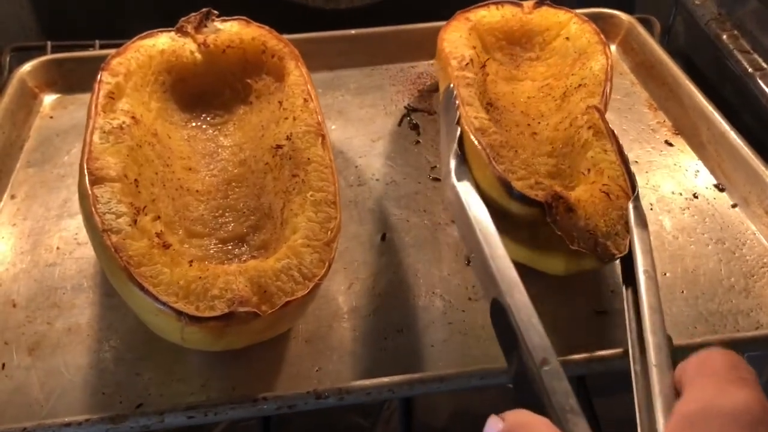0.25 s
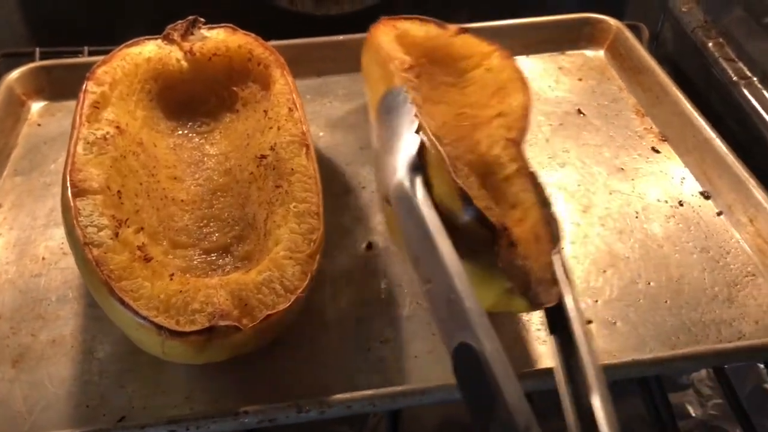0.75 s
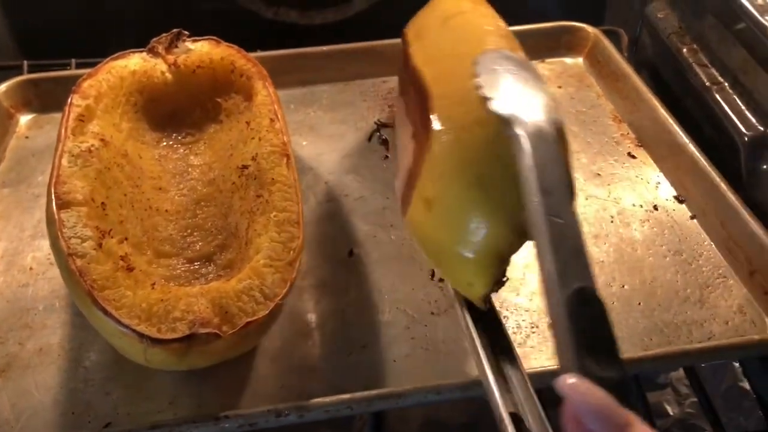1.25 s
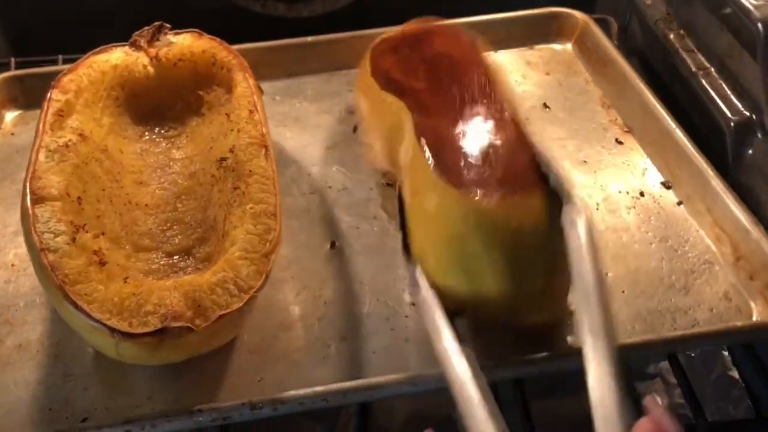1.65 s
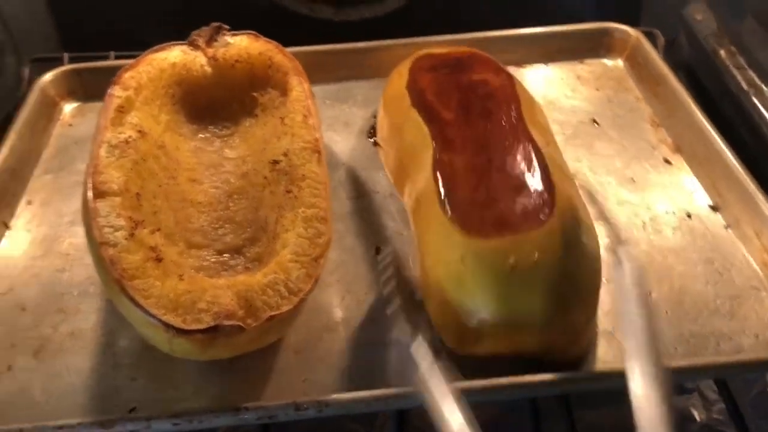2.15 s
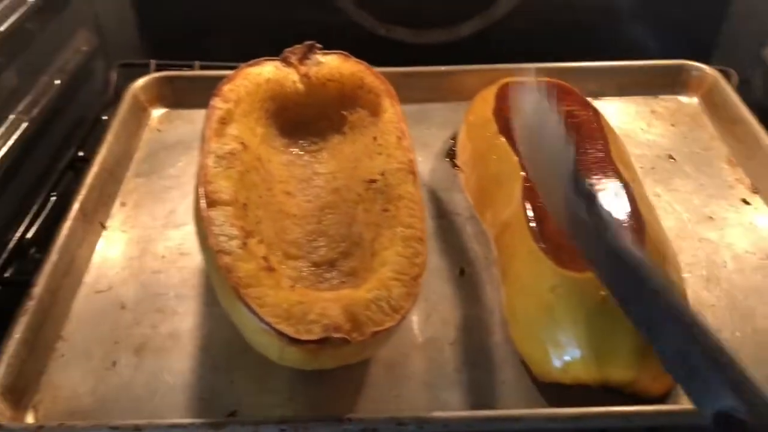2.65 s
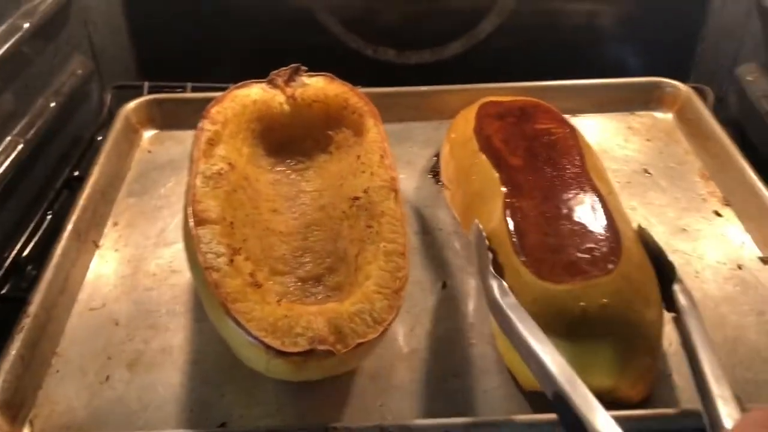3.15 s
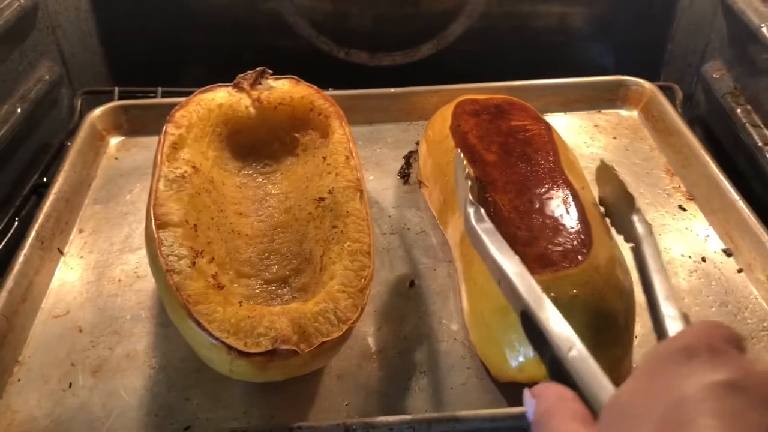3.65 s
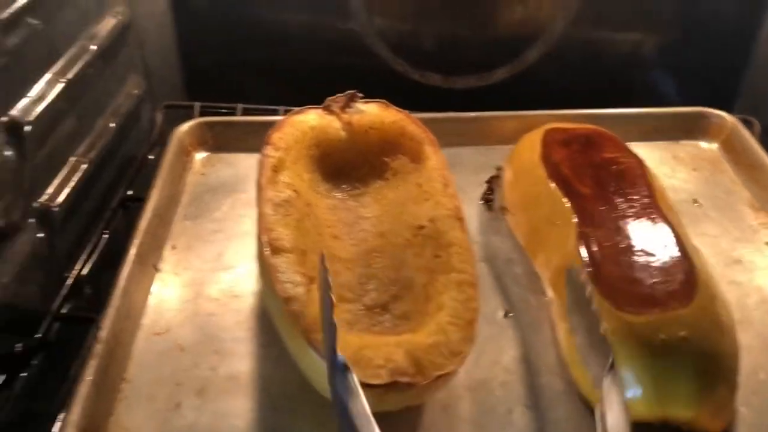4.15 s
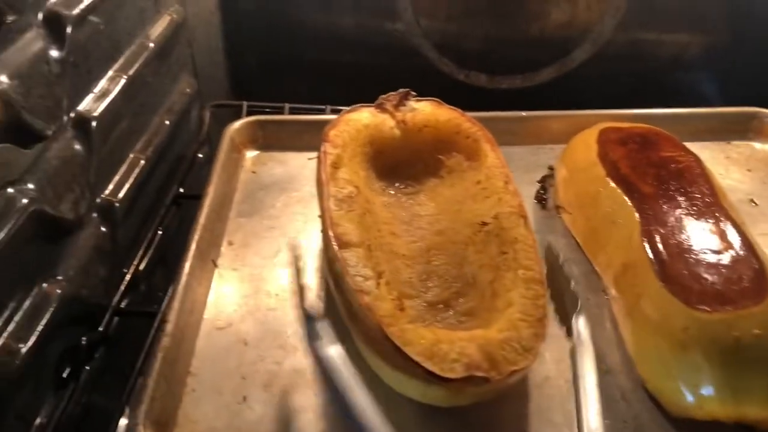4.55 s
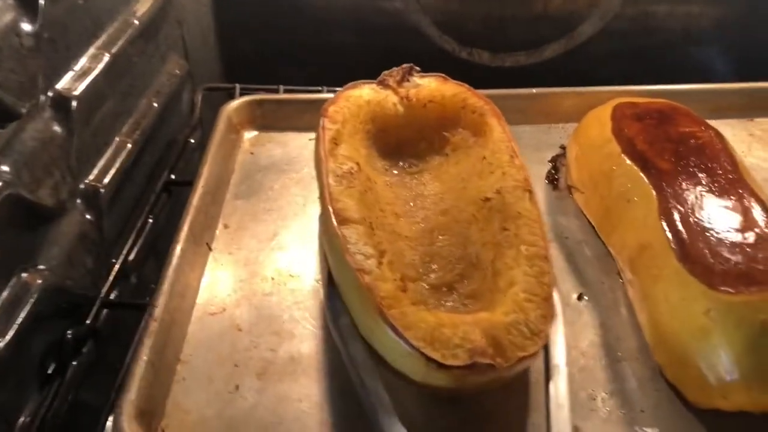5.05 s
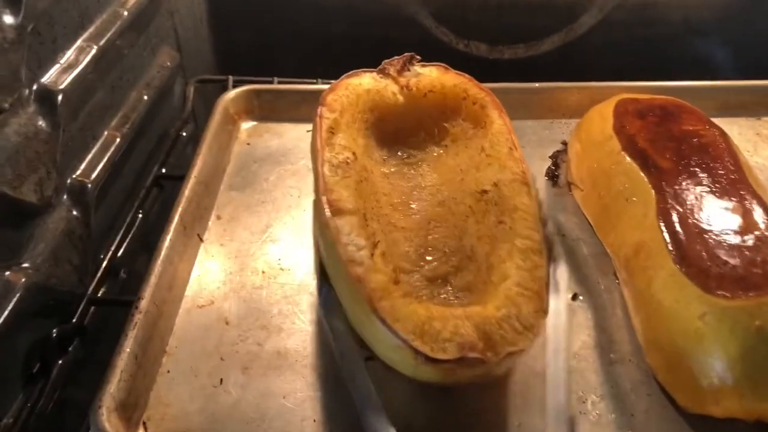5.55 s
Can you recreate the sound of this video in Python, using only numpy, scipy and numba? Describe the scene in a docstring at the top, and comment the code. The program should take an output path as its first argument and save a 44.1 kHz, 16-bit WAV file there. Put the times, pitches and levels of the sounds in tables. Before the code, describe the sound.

An open oven gives a steady low hum, soft fan air and faint spits of juice. Near the microphone, metal tongs click against a thin tray, then turn a squash half over with a loud clang and thud that rings briefly. The tray is knocked hard once more, and scattered clinks, dull bumps and scrapes continue as the tongs shift the squash halves.

```python
"""Metal tongs turn roasted squash halves on a baking sheet, close to a phone microphone.
Each blow rings the thin sheet; the food thuds and drags, the tong tips scratch, and sheet and
tong arms sing on in single tones. Behind them the open oven hums, its fan blows and juice spits.
Oven and kitchen add a short echo to the hand work; the phone turns loud moments down."""
import sys
import numpy as np
from scipy import signal
from scipy.fft import rfft, irfft
from scipy.io import wavfile
from scipy.ndimage import uniform_filter1d
from numba import njit

SR = 44100
rng = np.random.default_rng(int(sys.argv[2]) if len(sys.argv) > 2 else 0)


def put_to_file(sound):
    """Save the sound as 16-bit audio at rate SR, in the file named by the first command-line argument."""
    columns = np.atleast_2d(sound).T  # one column per channel
    safe = np.clip(columns, -1, 1)
    whole_steps = np.round(safe * 32767)
    wavfile.write(sys.argv[1], SR, whole_steps.astype(np.int16))


N = 256662
TIME_S = np.arange(N) / SR


def undb(db):
    """Decibels to gain."""
    return 10 ** (np.asarray(db) / 20)


def unit(x):
    """Scale to rms 1."""
    return x / np.sqrt(np.mean(x ** 2))


def band(x, hz, width_hz):
    """Resonance with gain 1 at its centre."""
    return signal.lfilter(*signal.iirpeak(hz, hz / width_hz, fs=SR), x)


def steep_band(x, hz, width_hz):
    """The same resonance twice, for steeper skirts."""
    return band(band(x, hz, width_hz), hz, width_hz)


def log_interp(hz, points_hz, values):
    """Read a curve along a logarithmic frequency axis."""
    return np.interp(np.log(hz), np.log(points_hz), values)


def wander(rate_hz):
    """Smooth random drift with rms 1."""
    hold = int(SR / rate_hz)
    steps = np.repeat(rng.standard_normal(N // hold + 1), hold)
    return unit(uniform_filter1d(uniform_filter1d(steps, hold), hold)[:N])


def clicks(per_s, spread_db):
    """Random clicks, a few larger than the rest, as in stick-slip friction."""
    when, polarity, size = rng.random((3, N))
    return (when < per_s / SR) * np.sign(polarity - .5) * undb(-spread_db * np.log(1 - size))


@njit
def ring(start, hz, t60_s, gain):
    """Sum of decaying sines; each array is indexed [event, mode], start is in samples."""
    out = np.zeros(N)
    for mode in np.ndindex(hz.shape):
        decay = np.exp(-np.log(1000.) / (t60_s[mode] * SR))
        step = 2 * np.pi * hz[mode] / SR
        feedback = 2 * decay * np.cos(step)
        now, before = gain[mode] * np.sin(step), 0.
        for i in range(start[mode], min(N, start[mode] + int(.85 * t60_s[mode] * SR))):
            out[i] += now
            now, before = feedback * now - decay * decay * before, now
    return out


def mains_hum(pitch_hz=120.1, tone_db=-44, rough_db=-50.5):
    """The oven's mains hum: a wavering tone with a narrow band of noise around it."""
    phase = 2 * np.pi * pitch_hz * TIME_S + .24 * wander(5.73)
    tone = np.sqrt(2) * np.sin(phase) * undb(tone_db + .8 * wander(17))
    rough = unit(steep_band(rng.standard_normal(N), pitch_hz, width_hz=24))
    return tone + undb(rough_db) * rough


# Spectrum of fan and sizzle at the open oven door: frequency_hz, relative_db
AIR_SPECTRUM = [(15, -40), (25, -23.5), (90, 0), (124, -21), (146, -2), (313, -19.5), (726, -39),
                (878, -48), (1030, -26.5), (1510, -23.5), (1780, -34), (3320, -34), (12200, -95),
                (16500, -36)]
# Resonances of the oven box: pitch_hz, width_hz, level_db
BOX_MODES = [(395, 40, -78), (696, 24, -70.5), (1051, 54, -61)]


def oven_fan(air_db=-49.5):
    """Fan air with a fine sizzle, and the oven box resonating to the fan."""
    bins_hz = np.maximum(np.fft.rfftfreq(N, 1 / SR), 1)
    colour = undb(log_interp(bins_hz, *np.transpose(AIR_SPECTRUM)))
    noise = rng.standard_normal(N) + .073 * clicks(per_s=60, spread_db=4)
    air = unit(irfft(rfft(noise) * colour, N)) * undb(air_db + .6 * wander(.87))
    box = sum(unit(band(rng.standard_normal(N), hz, width_hz)) * undb(db + 2.5 * wander(4.32))
              for hz, width_hz, db in BOX_MODES)
    return air + box


def juice_spits(level_db=-72, t60_s=.03):
    """Juice spits on the hot sheet: faint, short bursts of treble."""
    decay = undb(-60 * TIME_S[:int(t60_s * SR)] / t60_s)
    bursts = signal.fftconvolve(np.abs(clicks(per_s=14, spread_db=3)), decay)[:N]
    hiss = band(rng.standard_normal(N), hz=7000, width_hz=8000)
    return undb(level_db) * unit(bursts * hiss)


# Level curve of the tong tips scratching, close to the microphone: time_s, level_db
SCRATCH_LEVELS = [(0, -63), (.5, -59.5), (.7, -55), (.95, -59.5), (1.45, -57), (1.6, -47.5), (1.65, -42),
                  (1.8, -55), (2, -70), (2.05, -46), (2.17, -59), (2.4, -62.5), (3, -59), (3.4, -54),
                  (3.6, -54), (4, -58), (4.97, -55), (5.45, -58), (5.6, -49), (5.7, -56.5), (5.82, -59)]


def tong_scratch():
    """The tips stick and slip thousands of times a second: a fine, flickering scratch."""
    level_db = np.interp(TIME_S, *np.transpose(SCRATCH_LEVELS)) + .7 * wander(12)
    slips = clicks(per_s=9000, spread_db=1) * undb(1.1 * wander(40))
    return unit(band(slips, hz=1800, width_hz=6900)) * undb(level_db)


# Clear modes of the sheet, dragged on here and struck in sheet_blows: pitch_hz, relative_db, t60_s
SHEET_MODES = [(275, -22, 0.099), (310, -7, 0.033), (380.6, -13, 0.17), (395, -5.5, 0.25),
               (393, -28.5, 0.48), (541, -37, 0.28), (593, -11, 0.041), (688.6, -5.5, 0.25),
               (818, -20, 0.14), (862, -15, 0.36), (1006, -9.5, 0.094), (1200, -15, 0.09),
               (1300, -21, 0.089), (1576, -22.5, 0.38), (1740, -16.5, 0.068), (1844, -22, 0.35),
               (2041, -14.5, 0.12), (2280, -45.5, 0.033), (2990, -25, 0.23), (3795, -13, 0.058),
               (4690, -21.5, 0.09)]
# Peaks of the sheet rattling on after blows: peak_s, level_db, fall_db_per_s
SHEET_RATTLES = [(.196, -50.5, 102), (.6, -48.5, 13), (0.769, -40, 135), (1.237, -41.5, 80),
                 (1.685, -15.5, 104), (1.8, -29, 200), (2.004, -36, 117), (2.165, -37, 213),
                 (3.04, -37.5, 168), (3.245, -42.5, 60), (3.49, -48, 38), (3.724, -43, 29),
                 (4.01, -38.5, 123), (4.4, -49.5, 200), (4.66, -58, 35), (4.94, -44.5, 120), (4.996, -35, 73),
                 (5.24, -49, 85), (5.398, -39.5, 90), (5.555, -33.5, 74)]


def food_drag(resting_db=-58.5, rise_db_per_s=914.5):
    """Dragging food wakes the sheet's clear modes; after each blow the sheet rattles on, swelling and dying
    away."""
    level_db = resting_db + 5.5 * wander(24.84)
    for peak_s, peak_db, fall_db_per_s in SHEET_RATTLES:
        age_s = TIME_S - peak_s
        drop_db = np.where(age_s < 0, -rise_db_per_s * age_s, fall_db_per_s * age_s)
        level_db = np.maximum(level_db, peak_db - drop_db)
    friction = steep_band(clicks(per_s=2000, spread_db=1.5), hz=400, width_hz=1300)
    sheet = sum(undb(db) * band(friction, hz, 4.6 / t60_s + 8) for hz, db, t60_s in SHEET_MODES)
    return unit(sheet) * undb(level_db)


# Single tones of the sheet, held by rubbing or ringing on after the food lands:
# start_s, end_s, pitch_hz, level_db
SHEET_TONES = [(0.184, 0.32, 398, -58), (0.718, 0.94, 392, -51), (0.81, 1.1, 679, -56.5),
               (1.236, 1.346, 402, -45), (1.726, 1.863, 279.7, -28.5), (1.794, 2.27, 390.8, -35),
               (1.797, 1.952, 1390, -51), (2.085, 2.12, 1710, -41), (2.143, 2.179, 1750, -44),
               (2.146, 2.2, 2980, -48), (3.346, 3.366, 2874, -51.5), (3.466, 3.6, 700, -49),
               (4.37, 4.542, 1076, -53.5), (3.71, 3.83, 389, -56), (4.656, 4.856, 393, -47),
               (4.99, 5.02, 1647, -30.5), (5.548, 5.64, 413.2, -30), (5.559, 5.631, 2360, -50),
               (5.652, 5.67, 2450, -45)]
# Modes of the tong arms: pitch_hz, relative_db
TONG_MODES = [(4850, -2.5), (5200, 1), (6000, -3.5), (7500, -15), (12650, -10)]
# Rubs that sound all the arm modes together: start_s, end_s, level_db
TONG_RUBS = [(2.14, 2.18, -42.5), (3.437, 3.49, -62), (3.524, 3.596, -56), (3.628, 3.676, -62),
             (3.987, 4.092, -56), (4.155, 4.216, -59.5), (5.468, 5.501, -56), (5.532, 5.65, -55.5)]


def singing_metal(steady_below_hz=1500):
    """Modes sing when rubbed or ring on after a landing: heavy low ones steady, high ones gritty."""
    out = np.zeros(N)
    arm_tones = [(start_s, end_s, hz, rub_db + mode_db)
                 for start_s, end_s, rub_db in TONG_RUBS for hz, mode_db in TONG_MODES]
    for start_s, end_s, hz, db in SHEET_TONES + arm_tones:
        span = np.arange(int(start_s * SR), int(end_s * SR))
        width_hz = hz * (.022 if hz > 4000 else .04)  # the high tong modes are more sharply tuned
        grit = unit(steep_band(rng.standard_normal(SR // 2), hz, width_hz))[-len(span):]
        sine = np.sin(2 * np.pi * hz * span / SR)
        steady_share = 1 / (1 + (hz / steady_below_hz) ** 2)
        tone = np.sqrt(2 * steady_share) * sine + np.sqrt(1 - steady_share) * grit
        progress = np.linspace(0, 1, len(span))
        envelope = np.minimum(progress / .031, 1) * (1 - progress ** 2)
        out[span] += undb(db) * envelope * tone
    return out


# Dull knocks of the food and the oven rack: start_s, level_db, pitch_hz, t60_s
KNOCKS = [(1.678, -19.5, 159.3, 0.39), (1.723, -32, 75.8, 1), (3.04, -23.5, 178, 0.19),
          (3.23, -27.5, 186, 0.089), (3.231, -27.5, 890, 0.018), (3.247, -22, 86, 0.12),
          (5.023, -29.5, 155, 0.087), (5.559, -32, 159, 0.2)]


def food_and_rack_thuds():
    """Each knock rings a single damped mode."""
    start_s, level_db, pitch_hz, t60_s = np.transpose(KNOCKS)[:, None].copy()
    return ring((start_s * SR).astype(np.int64), pitch_hz, t60_s, undb(level_db))


# Trend of the sheet's crowd of closely spaced modes: pitch_hz, relative_db, t60_s
CROWD_TREND = [(460, -19.5, 0.18), (970, -20, 0.082), (2640, -27, 0.13), (6600, -23, 0.086),
               (12100, -27.5, 0.078), (16500, -35.5, 0.012)]
# Blows on the sheet, close to the microphone:
# start_s, level_db, bass_db, treble_db, ring_length_ratio, spot_hz
SHEET_BLOWS = [(0.3661, -48.5, -10, -3, 0.87, 6250), (0.4174, -35.5, -49, 8.5, 0.26, 5740),
               (0.586, -46, 14.5, -25, 0.73, 1540), (0.7056, -36.5, 8, -34, .82, 1000),
               (0.7659, -39.5, -8, -22, 1, 2540), (0.7997, -41, -2, -11, 0.54, 1000),
               (0.9028, -49, -10, -6, .71, 1280), (1.23, -33, 2.5, -10.5, 1, 2700),
               (1.2903, -42, -15, -10, .9, 7500), (1.3513, -42, -24, -14, 0.45, 1560),
               (1.4112, -42, -17, -4, 0.52, 3330), (1.5706, -44, -20, 16, 0.39, 4800),
               (1.5834, -38, -2, -5, .98, 5180), (1.645, -23, -8, -9, 0.96, 2240),
               (1.6577, -22, -6, -4.5, 1, 2390), (1.6738, -10, -2.5, 5, 0.83, 4400),
               (1.6796, -3, -11.5, -39, 0.82, 3160), (1.692, -8, -10.5, -1, 0.97, 704),
               (1.7092, -5, -2, -9.5, 0.6, 2120), (1.7233, -17.5, 2, -0.5, 1, 3000),
               (1.737, -9, -2.5, -3.5, 0.78, 1880), (1.7601, -8, -11, -14, 0.23, 1320),
               (1.7833, -15, -2.5, -15, 0.89, 2910), (1.7981, -22, 16, -19, 0.35, 2000),
               (1.8764, -31.5, -7, -24, .79, 2420), (1.919, -27.5, -16, -12, 0.94, 2440),
               (1.9633, -29, -6, -25, 1, 2330), (1.9793, -12.5, -5, -4, 0.36, 1120),
               (2.0991, -19.5, -25, -22, 1, 970), (2.144, -18.5, -7, -16, 0.58, 1680),
               (2.3171, -48, 16.5, -21, 0.78, 1200), (2.4205, -37, -7, -3.5, 0.33, 1180),
               (2.533, -48.5, -22, -8, 1, 5140), (2.557, -46.5, -25, -2.5, .59, 5150),
               (3.001, -34.5, -23, -7, 0.73, 1210), (3.0362, -4.5, -6, 0.5, 0.38, 1250),
               (3.048, -13.5, -6, -5, 0.32, 710), (3.233, -37.5, 16, -37, 0.36, 1300),
               (3.3153, -41, -19, -12, 1, 1530), (3.5153, -40.5, -7, -6, 0.93, 1390),
               (3.5545, -37, -13, -6.5, 0.31, 1530), (3.655, -51, 19.5, 2, 0.74, 1530),
               (3.716, -32, 7, -22, 0.48, 2170), (3.7647, -32, 9.5, -30, 0.72, 2800),
               (3.8451, -42.5, 12, -27, 0.49, 2070), (3.9791, -29, -12, -8, 0.72, 6200),
               (3.996, -33.5, -4, -10, 1, 3500), (4.0067, -32, 1, -7, 0.81, 940),
               (4.0178, -48, 0, 6, 1, 5970), (4.041, -31.5, -21, -6.5, 0.38, 5870),
               (4.1929, -49.5, 2, 6.5, .81, 5700), (4.214, -58.5, 24, 12.5, 0.69, 9100),
               (4.615, -36, -2, -10, 0.29, 4250), (4.655, -16, -3, -2, 0.48, 1210),
               (4.7248, -19, -5.5, -13.5, 0.65, 1130), (4.8855, -43, 0, -5, 0.73, 1000),
               (4.9345, -36.5, -4, -12, 0.97, 1640), (4.992, -18, -19, -6.5, 0.45, 1550),
               (5.0113, -22.5, -6, -15, 0.41, 990), (5.0632, -33.5, 8.5, -46, 0.64, 2380),
               (5.154, -42.5, 14.5, -15, 0.7, 2400), (5.2404, -50.5, 3, -13, .51, 1210),
               (5.4006, -26.5, 0, -20, .7, 2470), (5.5482, -20.5, -1, -26, 0.68, 2520),
               (5.5794, -37, 8, -2.5, 0.44, 900), (5.6447, -29.5, 8, -12, 0.42, 2600),
               (5.6824, -35.5, 13, -37, 0.22, 2540)]
# Anchors of a blow's tone colour: bass_hz, low_mid_hz, mid_hz, treble_hz
COLOUR_POINTS_HZ = [350, 950, 2700, 8500]


def sheet_modes(crowd_count=560):
    """A thin sheet has a few clear modes and a dense crowd, here scattered at random."""
    trend_hz, trend_db, trend_t60_s = np.transpose(CROWD_TREND)
    position = (np.arange(crowd_count) + rng.random(crowd_count)) / crowd_count
    hz = 450 + 16000 * position ** 1.15
    crowd = [hz, log_interp(hz, trend_hz, trend_db), log_interp(hz, trend_hz, trend_t60_s)]
    return np.hstack([np.transpose(SHEET_MODES), crowd])


def sheet_blows(spot_lift_db=7.5, chatter_s=.0012):
    """Each blow rings all the sheet's modes: weight brings out the bass, hardness the treble."""
    mode_hz, mode_db, mode_t60_s = sheet_modes()
    starts, pitches, decays, gains = [], [], [], []
    for start_s, level_db, bass_db, treble_db, ring_length_ratio, spot_hz in SHEET_BLOWS:
        low_mid_db = -4.5 + .25 * treble_db  # a hard contact lifts the low mids too
        colour_db = log_interp(mode_hz, COLOUR_POINTS_HZ, [bass_db, low_mid_db, 0, treble_db])
        # the struck spot favours one group of modes
        spot_db = spot_lift_db * np.exp(-(np.log(mode_hz / spot_hz) / .21) ** 2)
        strength, shift, lag = rng.standard_normal((3, len(mode_hz)))
        gains.append(undb(level_db + mode_db + colour_db + spot_db + 1.8 * strength) * np.sign(shift))
        # the contact chatters, so the modes do not all start together
        starts.append((start_s + chatter_s * np.abs(lag)) * SR)
        # food and tongs resting on the metal detune and damp the modes
        pitches.append(mode_hz * (1 + .0056 * shift))
        decays.append(mode_t60_s * ring_length_ratio)
    ringing = ring(np.array(starts, np.int64), np.array(pitches), np.array(decays), np.array(gains))
    # the blows carry little below about 220 Hz
    return signal.sosfilt(signal.butter(3, 220, "high", fs=SR, output="sos"), ringing)


def kitchen_echo(sound, level_db=-15.5, t60_s=.26, delay_s=.004):
    """Oven and kitchen walls return a short, dulled echo."""
    t = TIME_S[:SR // 2]
    tail = rng.standard_normal(len(t)) * undb(-60 * t / t60_s) * (t > delay_s)
    dulled = signal.lfilter([1], [1, -.5], tail)
    return undb(level_db) * signal.fftconvolve(sound, dulled / np.linalg.norm(dulled))[:N]


def scene():
    """At the open oven, in mono: close hand work and its echo over hum, fan and spitting juice."""
    work = sheet_blows() + food_and_rack_thuds() + tong_scratch() + food_drag() + singing_metal()
    return (work + kitchen_echo(work) + mains_hum() + oven_fan() + juice_spits())[None]


@njit
def follow_level(x, attack_s, release_s):
    """Envelope with separate rise and fall times."""
    level, out = 0., np.empty(len(x))
    for i in range(len(x)):
        lag_s = attack_s if abs(x[i]) > level else release_s
        level += (abs(x[i]) - level) / (lag_s * SR)
        out[i] = level
    return out


def record(dry):
    """The phone microphone: bass cut, gentle gain control above a knee, soft peaks, top cut."""
    knee_db, ceiling, bass_cut_hz, top_cut_hz = -14, .85, 45, 16100
    mic = signal.sosfilt(signal.butter(2, bass_cut_hz, "high", fs=SR, output="sos"), dry)
    level = follow_level(mic[0], attack_s=.0092, release_s=.25)
    gain = np.minimum(1, undb(knee_db) / (level + 1e-9)) ** .16
    softened = ceiling * np.tanh(mic * gain / ceiling)
    return signal.sosfilt(signal.ellip(8, .3, 60, top_cut_hz, fs=SR, output="sos"), softened)


dry = scene()
out = record(dry)
put_to_file(out)
```